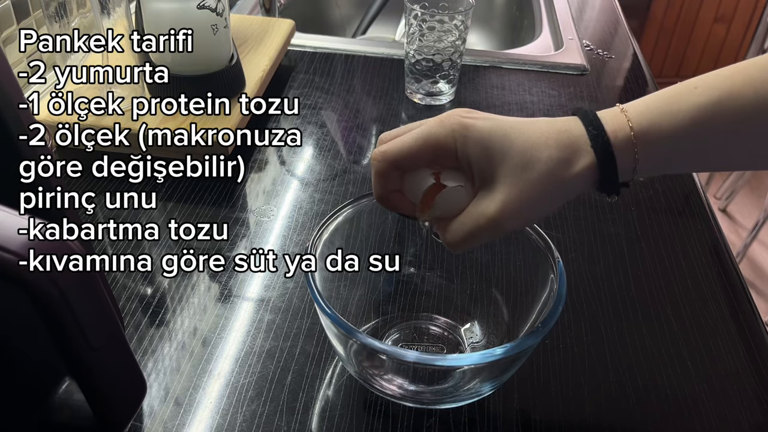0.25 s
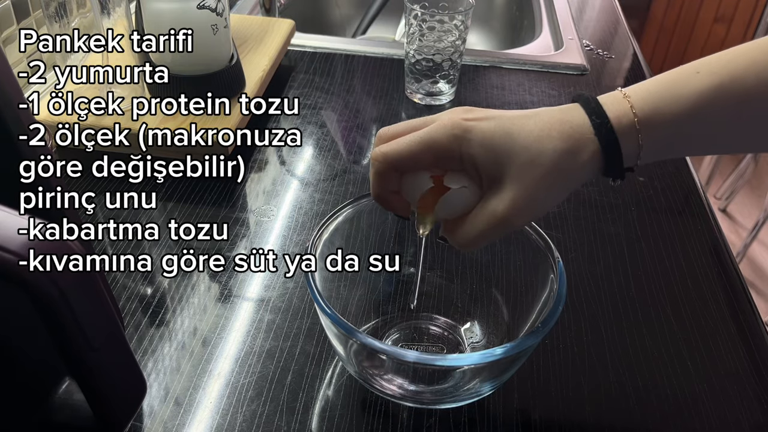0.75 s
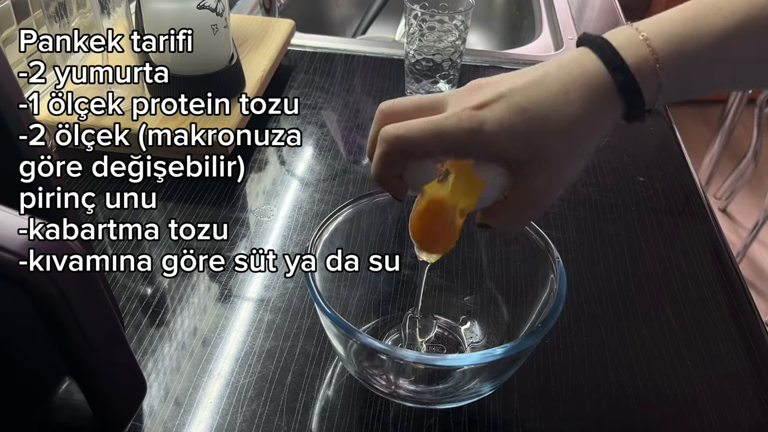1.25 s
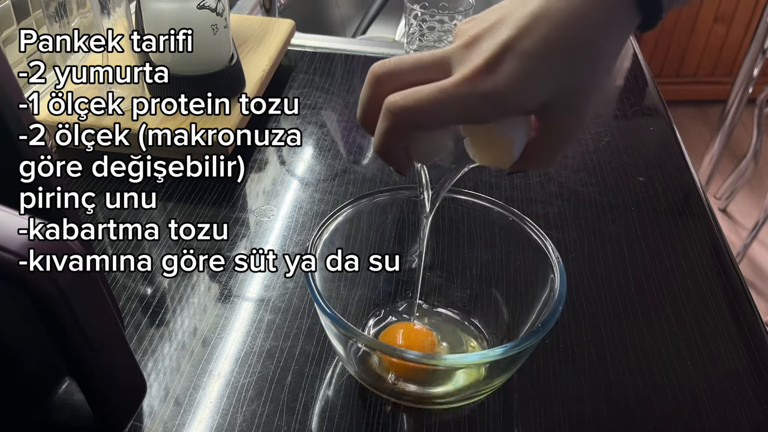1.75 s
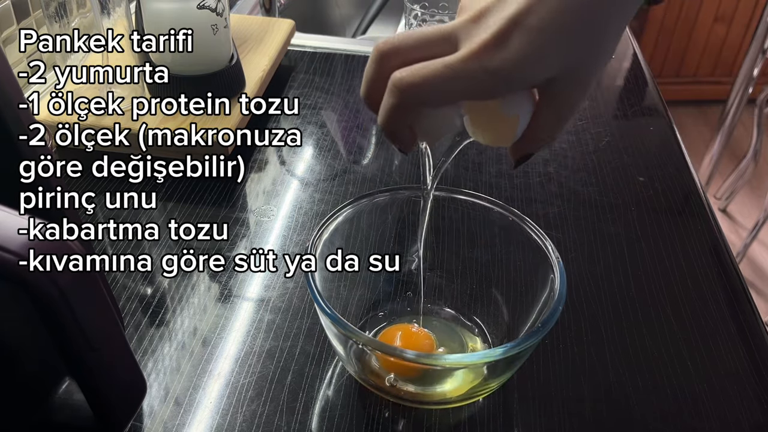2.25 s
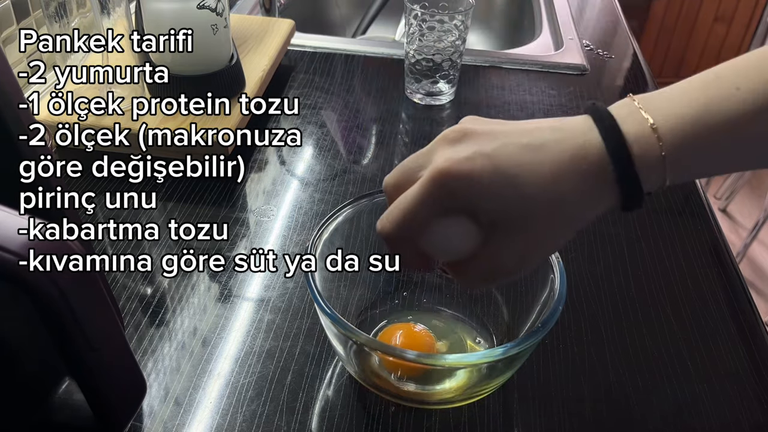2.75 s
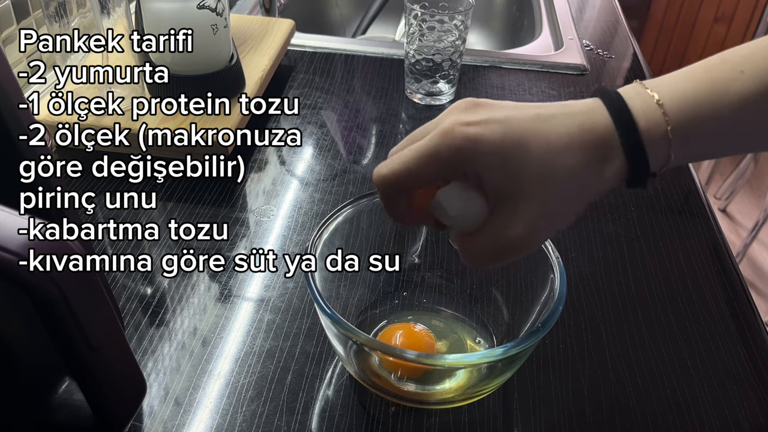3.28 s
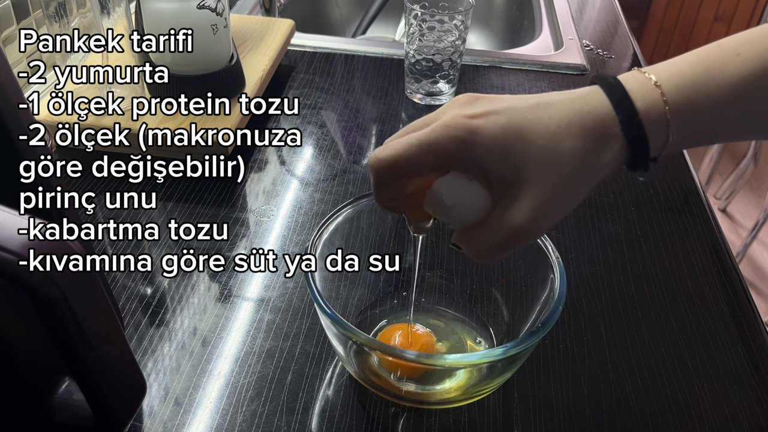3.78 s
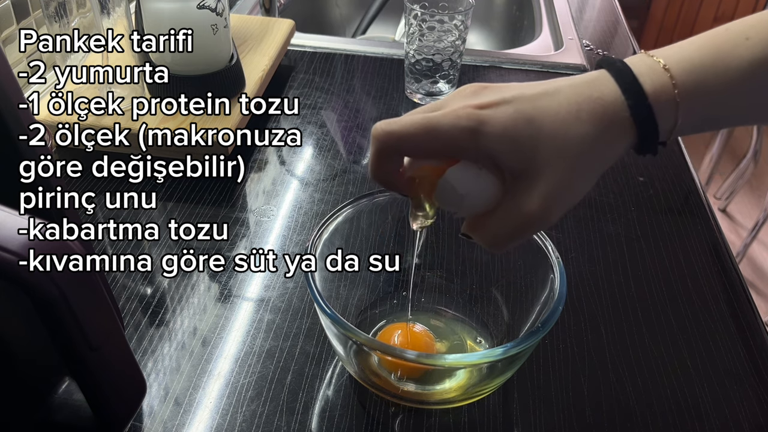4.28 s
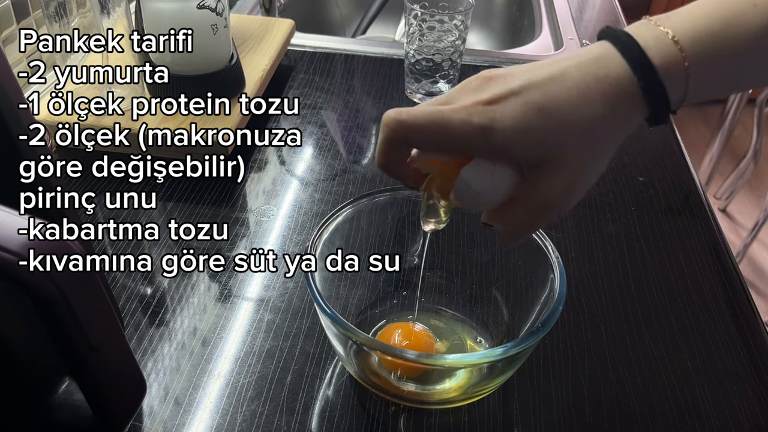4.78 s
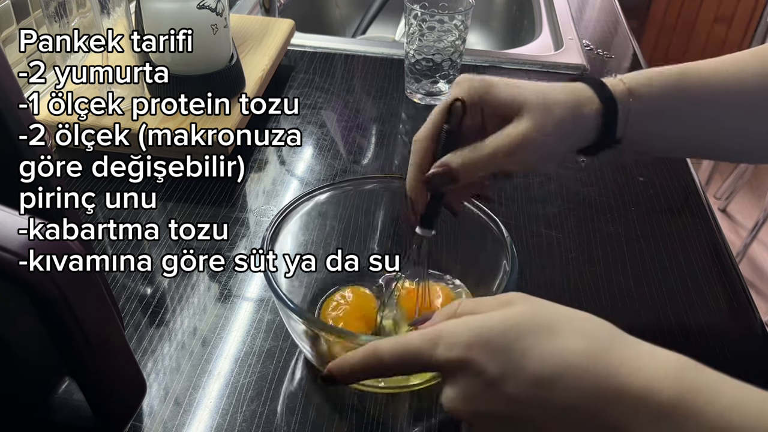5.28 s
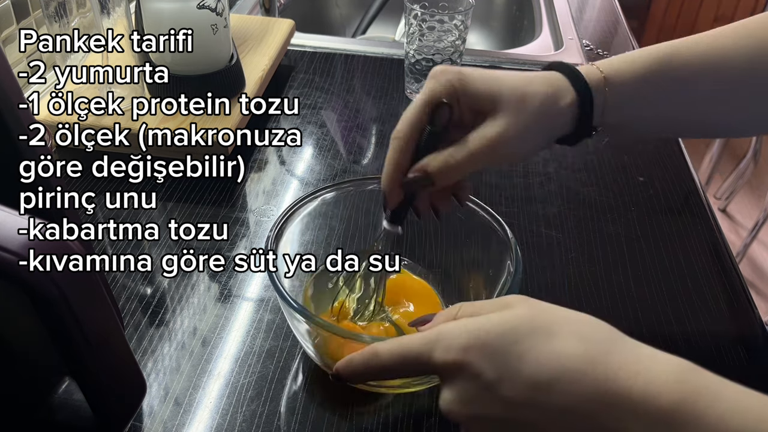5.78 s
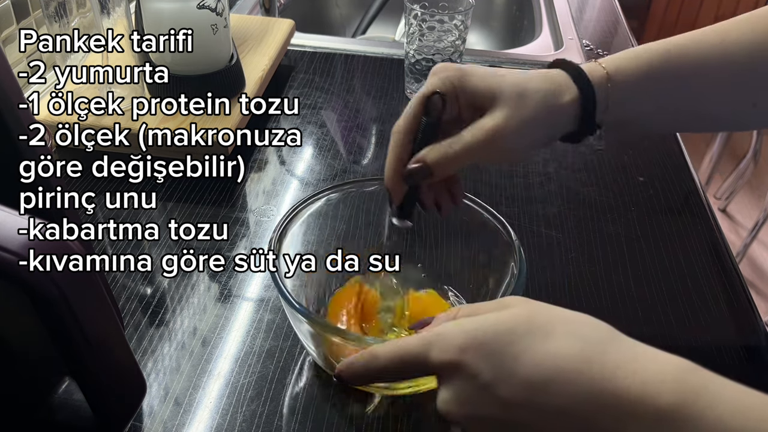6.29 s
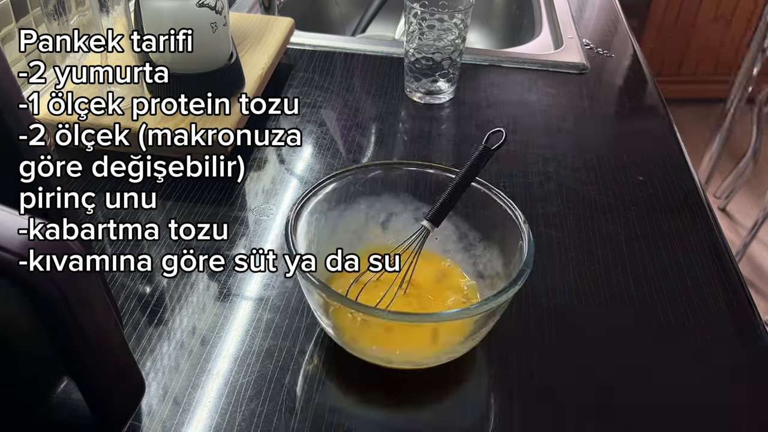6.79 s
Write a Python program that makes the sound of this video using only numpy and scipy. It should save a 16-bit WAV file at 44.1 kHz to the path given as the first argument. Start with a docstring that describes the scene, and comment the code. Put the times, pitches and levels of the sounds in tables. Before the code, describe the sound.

At about 0.2 seconds an eggshell gives way in one hand with a crisp crunch and a soft thud. Brittle snaps follow, thickest around 0.8 seconds. From 1 to 2 seconds the crackles turn quieter and hollower, and a yolk plops faintly at about 1.4. A lull holds only a few tiny ticks. At 3.3 seconds a second shell crunches, with a sharp snap near 3.9 and uneven crackling until 5. From 5.2 seconds a small wire whisk beats the eggs quickly, a little softer than the sharpest cracks. Its wires scrape and tick on the glass bowl, with dull knocks from bowl and counter. The whisking cuts off at about 6.8 seconds, leaving a faint low rumble and hum that runs underneath throughout. Everything sounds close, with the short echoes of a small, hard kitchen.

```python
"""Two eggshells are crushed open in one hand over a glass bowl, then a small wire whisk beats the eggs.
Each snap cracks, rings its piece of shell and sounds the air hollow of hand and shell; squeezes thud,
a yolk plops and fingers slide. Whisk wires scrape and knock the glass, shaking bowl and kitchen counter.
A low background noise fills the small hard room, whose echoes cut off abruptly a few times."""
import sys
import numpy as np
from scipy import signal
from scipy.fft import rfft, irfft, next_fast_len
from scipy.io import wavfile
from scipy.ndimage import uniform_filter1d, map_coordinates

SR = 44100
rng = np.random.default_rng(int(sys.argv[2]) if len(sys.argv) > 2 else 0)


def generate_wav(sig):
    """Save sig (samples, or channels by samples) to the path in sys.argv[1] as 16-bit PCM at SR."""
    pcm = np.round(np.clip(np.atleast_2d(sig).T, -1, 1) * 32767).astype(np.int16)
    wavfile.write(sys.argv[1], SR, pcm)


N = 310243
TIME_S = np.arange(N) / SR


def amp(db):
    """Gain of a level in dB."""
    return 10 ** (np.asarray(db) / 20)

def unit(x):
    """x at rms 1."""
    return x / np.sqrt(np.mean(x ** 2) + 1e-20)

def unit_peak(x):
    """x with its loudest 60 samples at rms 1."""
    return x / np.sqrt(uniform_filter1d(x ** 2, size=60).max())

def along(points, hz):
    """Interpolates (frequency, value) points on a log axis."""
    f, values = np.transpose(points)
    return np.interp(np.log(hz + 1), np.log(f + 1), values)

def curves(rows):
    """One value per sample for each column after the time."""
    times, *columns = np.transpose(rows)
    return [np.interp(TIME_S, times, column) for column in columns]

def wobble(rate_hz):
    """Smooth random curve, rate_hz knots a second."""
    knots = rng.standard_normal(int(N * rate_hz / SR) + 4)
    return map_coordinates(knots, [TIME_S * rate_hz])

def filtered(x, response):
    """x through a complex frequency response."""
    n = x.shape[-1]
    size = next_fast_len(n + min(n // 2, 8192))
    return irfft(rfft(x, size) * response(np.fft.rfftfreq(size, 1 / SR)), size)[..., :n]

def modes(table):
    """Response of (frequency [Hz], width [Hz], gain [dB]) resonances, alternating in sign."""
    return lambda f: sum((-1) ** k * amp(db) * 1j * f * width / (hz * hz - f * f + 1j * f * width)
                         for k, (hz, width, db) in enumerate(table))

def band(hz, width_hz):
    """Response of two equal resonators in series."""
    return lambda f: modes([(hz, width_hz, 0)])(f) ** 2

def shape(points):
    """Response of (frequency [Hz], gain [dB]) points."""
    return lambda f: amp(along(points, f))

def add(out, start_s, sound):
    """Mixes a sound in at a time."""
    part = out[..., round(start_s * SR):][..., :sound.shape[-1]]
    part += sound[..., :part.shape[-1]]

def grit(n, spiky_db):
    """Noise of uneven grains, about 1 ms each."""
    grain_size = np.repeat(rng.standard_normal(n // 40 + 1), 40)[:n]
    return unit(rng.standard_normal(n) * amp(spiky_db * grain_size))

def burst(t, rise_s, t60_s, crumbs_db, crumbs_t60_s):
    """A gritty impact plus fainter crumbs with their own decay."""
    crumbs = amp(crumbs_db - 60 * t / crumbs_t60_s) * grit(len(t), spiky_db=-2)
    impact = amp(-60 * t / t60_s) * grit(len(t), spiky_db=7.5)
    return (impact + crumbs) * (1 - np.exp(-t / rise_s)) ** 2


# (frequency [Hz], left-right correlation [ratio])
CORRELATION = [(60, 1), (200, .85), (400, 0.85), (800, .3), (2000, 0.6), (8000, 0.99)]

def stereo_noise(response):
    """Coloured noise at rms 1; the channels are least alike in the mids."""
    def mid_side_gains(f):
        angle = np.arccos(np.clip(along(CORRELATION, f), -1, 1)) / 2
        return np.array([np.cos(angle), np.sin(angle)])
    mid, side = filtered(rng.standard_normal((2, N)), mid_side_gains)
    return unit(filtered(np.array([mid + side, mid - side]), response))


# low background: (time [s], rumble [dB], drone [dB], hum [dB])
BACKGROUND_LEVELS = [(0, -67.5, -61, -77), (.3, -68, -66, -71), (.6, -86.5, -78.5, -80.5),
                     (1.1, -71.5, -72.5, -75), (1.5, -64.5, -67, -71), (2.0, -66, -66, -73.5),
                     (2.3, -75, -75.5, -79), (2.57, -72, -74, -71.5), (2.7, -62, -67, -71),
                     (3.11, -66, -63.5, -65.5), (3.5, -63, -67, -73), (4.01, -65.5, -66, -69.5),
                     (4.45, -55, -70, -65.5), (4.6, -58.5, -52.5, -71), (5.06, -58.5, -70.5, -74.5),
                     (5.13, -59.5, -66, -62), (6.84, -65.5, -62.5, -73), (7.03, -64.5, -72, -74)]
# noise spectra: (frequency [Hz], gain [dB])
RUMBLE_SPECTRUM = [(15, -40.5), (25, -19.5), (40, -7.5), (58, 2.5), (75, 1), (95, -27.5), (150, -69.5)]
DRONE_SPECTRUM = [(50, -55), (78, -14.5), (100, 1.5), (120, -9.5), (150, -18), (200, -61)]
HUM_SPECTRUM = [(76, -55), (130, -17.5), (209, -3), (247, -11.5), (332, -8), (360, -12.5), (594, -13.5),
                (742, -10), (1100, -38.5), (1430, -70.5), (2420, -120)]
HISS_SPECTRUM = [(600, -38), (900, -2.5), (1500, -0.5), (2500, -11), (4500, -12), (7000, -14), (12500, -22),
                 (13500, -40.5), (16500, -48.5)]

def kitchen(whine_hz=7850, whine_db=-82):
    """Low background rumble, drone and hum, swelling with handling noise; faint hiss and thin whine."""
    rumble_db, drone_db, hum_db = curves(BACKGROUND_LEVELS)
    hiss_db = -81 + 0.43 * (hum_db - hum_db.mean())
    out = amp(rumble_db + wobble(9.5)) * stereo_noise(shape(RUMBLE_SPECTRUM))
    out += amp(drone_db + 4.6 * wobble(5.9)) * stereo_noise(shape(DRONE_SPECTRUM))
    out += amp(hum_db + 1.1 * wobble(5.0)) * stereo_noise(shape(HUM_SPECTRUM))
    out += amp(hiss_db + 1.4 * wobble(1.1)) * stereo_noise(shape(HISS_SPECTRUM))
    whine_band = lambda f: np.exp(-((f - whine_hz) / 200) ** 2)
    return out + amp(whine_db + 2.5 * wobble(2.5)) * stereo_noise(whine_band)


# early reflections: (delay [s], gain [dB])
WALL_ECHOES = [(.0045, -14), (.008, -25.5), (.012, -26), (.017, -27.5)]
# tail decay: (frequency [Hz], t60 [s])
TAIL_DECAY = [(300, 0.18), (1300, 0.29), (3500, 0.32), (9000, 0.34), (15000, 0.22)]
# per-channel tail over the common tail: (frequency [Hz], gain [dB])
TAIL_SPREAD = [(100, -14), (300, 0.5), (700, 11.5), (2000, 1.5), (4500, 1), (8000, -34.5)]
# starts of echo spans, each cutting off the one before: (time [s])
ECHO_STARTS_S = [0, .49, 2.09, 2.6, 5.117, 6.752]

def room(x, tail_db):
    """Near-wall echoes and a diffuse tail, redrawn every quarter second and cut at each span's end."""
    out, step = np.zeros((2, N)), SR // 4
    edges = [round(s * SR) for s in ECHO_STARTS_S] + [N]
    for start, end in zip(edges, edges[1:]):
        for block in range(start, end, step):
            hz, t, spectra = signal.stft(rng.standard_normal((3, SR * 2 // 5)), SR, nperseg=256)
            spectra[1:] *= amp(along(TAIL_SPREAD, hz))[:, None]
            decay = amp(-60 * t / along(TAIL_DECAY, hz)[:, None])
            tails = signal.istft(spectra * decay, SR, nperseg=256)[1]  # common, left, right
            echo = amp(tail_db) * (tails[0] + tails[1:]) / np.linalg.norm(tails[0])
            echo[:, :250] *= np.linspace(0, 1, 250)
            for delay_s, db in WALL_ECHOES:
                arrivals = round(delay_s * SR) + rng.integers(30, size=2)
                echo[[0, 1], arrivals] += amp(db)
            wet = signal.fftconvolve(x[:, block:min(block + step, end)], echo, axes=1)
            add(out[:, :end], block / SR, wet)
    return out


# finger slides: (centre [s], 1/e half-length [s], frequency [Hz], level [dB])
SLIDES = [(0.091, 0.1, 4300, -79), (1.379, 0.07, 5175, -79), (3.623, 0.021, 4500, -73),
          (7.003, 0.033, 1670, -75.5)]

def fingers():
    """Skin slides on shell in short soft hisses."""
    out = np.zeros(N)
    for centre_s, half_s, hz, db in SLIDES:
        span = np.abs(TIME_S - centre_s) < 2 * half_s
        hiss = filtered(grit(span.sum(), spiky_db=-3.5), band(hz, .3 * hz))
        swell = np.exp(-((TIME_S[span] - centre_s) / half_s) ** 2)
        out[span] += amp(db) * unit(hiss) * swell
    return out


# brittle contact, wire or shell: (frequency [Hz], gain [dB])
CRACK_SPECTRUM = [(1500, -53.5), (3000, -29.5), (4500, 0), (5500, 1), (8000, 4.5), (11000, 2.5),
                  (14000, -1), (16500, 1.5)]

def crack(force):
    """The bright click of a hard contact."""
    return unit_peak(filtered(force, shape(CRACK_SPECTRUM)))

def shaken(table, envelope, spiky_db, spread_db=0, detune=0):
    """Tiny slips drive resonances at unit noise gain, with optional scatter in level and pitch."""
    force = envelope * grit(len(envelope), spiky_db)
    response = modes([(hz * (1 + detune * rng.normal()), width, db + rng.normal(0, spread_db))
                      for hz, width, db in table])
    rms_gain = np.sqrt(np.mean(np.abs(response(np.arange(1, SR // 2, 9))) ** 2))
    return filtered(force, response) / rms_gain


# resonances: (frequency [Hz], width [Hz], gain [dB])
WIRE_MODES = [(1250, 340, -13), (1790, 390, -12), (2410, 210, 5), (3100, 190, -11), (3940, 2300, -12),
              (4715, 72, 4.5), (5200, 90, -6), (6550, 130, 6), (6540, 130, -1), (7010, 110, 10),
              (7200, 220, 9), (9000, 1700, -2.5), (10140, 420, 2), (11580, 530, 2), (13260, 2000, -1.5)]
BOWL_MODES = [(196.3, 17.4, -0.5), (324, 40, 5), (431, 23, 8), (590, 310, -7), (676.5, 40, 7.5),
              (845, 73, 0.5), (1207, 80, -7.5), (1630, 340, -21.5)]
COUNTER_MODES = [(56, 27, -8), (103, 14, 3.5), (190.5, 9.2, -8), (248, 53, -16.5)]
# continuous stirring: (time [s], bowl level [dB])
STIR_LEVELS = [(5.225, -64), (5.3, -67), (5.43, -58), (5.72, -59), (6.15, -53.5), (6.59, -55), (6.755, -60)]
# strokes on the glass: (time [s], scrape [dB], bowl [dB], counter [dB])
WHISK_STROKES = [(5.24, -48, -36.5, -30.5), (5.302, -46, -47, -54), (5.409, -47, -42.5, -34),
                 (5.541, -44.5, -49, -40.5), (5.598, -49, -42, -38.5), (5.697, -59, -48, -46),
                 (5.734, -38, -41, -40.5), (5.782, -83, -46, -39.5), (5.894, -57, -47, -50),
                 (5.932, -37, -45.5, -43), (6.046, -60, -47.5, -39), (6.098, -36.5, -38.5, -49),
                 (6.188, -46, -42.5, -68), (6.295, -37.5, -47.5, -58.5), (6.405, -60, -52.5, -50),
                 (6.472, -37.5, -41, -78), (6.619, -48.5, -45.5, -54.5), (6.662, -41.5, -42.5, -52.5)]
# single wires hitting the bowl: (time [s], low band [dB], high band [dB])
WIRE_TICKS = [(5.232, -37.5, -28.5), (5.316, -48.5, -39), (5.3994, -63, -48.5), (5.5159, -50, -41),
              (5.5947, -68, -42.5), (5.691, -54, -45), (5.7813, -53, -32.5), (5.8902, -47.5, -41.5),
              (6.0436, -35, -36), (6.056, -47.5, -33.5), (6.1763, -58, -32.5), (6.205, -55.5, -47),
              (6.2824, -43, -42), (6.4017, -39.5, -44.5), (6.429, -46.5, -38.5), (6.6145, -47.5, -36.5),
              (6.685, -69, -42.5)]

def whisk(stop_s=6.752, rise_ms=9.5, fall_ms=9.84):
    """Wires drag and tick on the glass, shaking bowl and counter; wet wires never ring twice alike."""
    stir = amp(curves(STIR_LEVELS)[0]) * (TIME_S > STIR_LEVELS[0][0])
    out = shaken(WIRE_MODES, amp(-11) * stir, spiky_db=8)
    out += shaken(BOWL_MODES, stir, spiky_db=8)
    out += shaken(COUNTER_MODES, amp(2.5) * stir, spiky_db=-0.5)
    ms = np.arange(-2500, 5500) / SR * 1000
    swell = amp(-5.5 * np.where(ms < 0, (ms / rise_ms) ** 2, np.abs(ms / fall_ms) ** 1.2))
    push = amp(np.where(ms < 0, 1.8 * ms, -.4 * ms))
    for peak_s, scrape_db, bowl_db, counter_db in WHISK_STROKES:
        stroke = amp(scrape_db) * shaken(WIRE_MODES, swell, spiky_db=2.5, spread_db=2.7, detune=0.031)
        stroke += amp(bowl_db) * shaken(BOWL_MODES, swell, spiky_db=2, spread_db=2.8)
        stroke += amp(counter_db) * shaken(COUNTER_MODES, push, spiky_db=5.5, spread_db=0.42)
        add(out, peak_s + ms[0] / 1000, stroke)
    t = TIME_S[:1500]
    for start_s, low_db, high_db in WIRE_TICKS:
        knock = burst(t, rise_s=0.00068, t60_s=0.017, crumbs_db=-46, crumbs_t60_s=0.024)
        low = unit_peak(filtered(knock, band(2600, 900)))
        high = crack(burst(t, rise_s=0.0001, t60_s=0.019, crumbs_db=-20, crumbs_t60_s=0.029))
        add(out, start_s, amp(low_db) * low + amp(high_db) * high)
    return out * (TIME_S < stop_s)


# squeezes and yolk plop: (time [s], level [dB], frequency [Hz], t60 [s])
SOFT_THUDS = [(.185, -50.5, 700, 0.096), (0.2234, -31, 300, .018), (0.2252, -40, 170.4, .035),
              (.228, -40.5, 990, 0.024), (1.37, -56, 220, 0.46), (1.68, -49, 450, .1),
              (3.256, -50.5, 596, 0.18), (3.274, -44.5, 250, 0.23), (3.285, -44, 900, 0.19),
              (4.979, -57.5, 400, 0.17)]

def soft_thuds():
    """Soft low thuds: hand squeezes and the plop of the yolk dropping."""
    out, t = np.zeros(N), TIME_S[:2700]
    for start_s, db, hz, t60_s in SOFT_THUDS:
        attack = 1 - np.exp(-t / (0.044 * t60_s))
        force = rng.standard_normal(len(t)) * amp(-60 * t / t60_s) * attack
        add(out, start_s, amp(db) * unit_peak(filtered(force, band(hz, 1.7 * hz))))
    return out


# air hollow of hand and shell, one curve per egg: (time [s], frequency [Hz], level over ring [dB])
HOLLOW_CURVES = [
    [(.5, 745, -36.5), (.9, 839, -24.5), (1.0, 1466, -5), (1.35, 1537, 2.5), (1.449, 1664, 13.5),
     (1.9, 1820, -3.5)],
    [(3.6, 1970, -24), (3.85, 2020, -15.5), (4.5, 1830, -8), (4.77, 1460, -7), (4.85, 1286, 0),
     (5.1, 1230, -23.5)],
]
# shell breaks: (time [s], ring frequency [Hz], ring with hollow [dB], crack [dB], force t60 [ms])
SHELL_SNAPS = [(.1521, 2860, -60.5, -50.5, 23), (.1816, 2785, -39.5, -25, 16),
               (.1929, 2430, -33.5, -29.5, 35), (0.2235, 3720, -33, -24, 33),
               (0.2288, 4830, -25, -22.5, 12), (.341, 2760, -49, -48, 26), (0.4934, 2750, -57, -50.5, 11),
               (.5038, 4880, -60.5, -53, 24), (0.575, 3570, -61, -56, 51), (0.5901, 5060, -32.5, -25.5, 15),
               (.636, 5060, -47.5, -42, 14), (0.658, 4600, -48.5, -43, 14), (0.6917, 3300, -55.5, -56.5, 7),
               (0.7095, 3820, -51, -42, 26), (.738, 2930, -55, -48, 41), (0.7777, 2600, -32.5, -26, 5),
               (.7833, 4740, -32, -36, 19), (0.8208, 3060, -20, -27, 5), (.8256, 2440, -20.5, -24, 12),
               (.8355, 4100, -28, -28, 32), (.8553, 2480, -27.5, -26.5, 14), (0.8862, 4000, -42, -34.5, 18),
               (0.9082, 2900, -27.5, -28, 3.5), (0.9185, 2800, -41.5, -43, 13),
               (1.0487, 1520, -37.5, -49.5, 10), (1.0839, 1980, -62, -48, 42), (1.1588, 1530, -46, -45, 17),
               (1.2673, 1430, -69, -87, 9.7), (1.2912, 1440, -70, -80, 19), (1.3265, 1460, -65, -84, 20),
               (1.4138, 1640, -54, -52, 12), (1.4209, 1590, -33, -46, 26), (1.4406, 1670, -48.5, -63, 14),
               (1.6326, 1570, -57.5, -84, 8.1), (1.6681, 1520, -34, -57.5, 11),
               (1.683, 1630, -30, -44.5, 13), (1.6988, 1830, -37.5, -46.5, 91.3),
               (1.7629, 1600, -52.5, -72.5, 28), (1.8523, 3000, -58, -65.5, 20),
               (1.875, 1720, -44, -42, 15), (1.92, 2830, -49, -40, 30), (2.5779, 3120, -45.5, -52, 11),
               (2.8906, 2270, -57.5, -63.5, 6), (3.003, 2720, -68.5, -55.5, 11),
               (3.0588, 3830, -59, -60, 12), (3.1042, 2980, -51.5, -51, 7.9), (3.2511, 3300, -44.5, -35, 6),
               (3.2677, 2270, -35.5, -25, 90), (3.284, 2330, -30, -23, 52), (3.2927, 3000, -35, -23, 34),
               (3.3039, 2360, -31, -24.5, 37), (3.313, 4250, -32.5, -23, 22),
               (3.4144, 3980, -53.5, -46.5, 37), (3.4835, 2170, -59, -57, 47),
               (3.6032, 4400, -60.5, -71, 3.2), (3.6435, 4550, -65, -56.5, 5.7),
               (3.6758, 3060, -36, -38.5, 15), (3.728, 4130, -59.5, -56.5, 37), (3.8172, 2120, -44, -41, 8),
               (3.827, 2000, -47, -40, 30), (3.871, 2240, -36.5, -35, 11), (3.9165, 2400, -16.5, -21, 16),
               (3.9316, 3010, -49, -24.5, 17), (3.9493, 3100, -58, -23.5, 10), (3.962, 4820, -47, -26.5, 3),
               (4.017, 3740, -43, -46.5, 22), (4.0595, 2670, -38.5, -30, 7.6),
               (4.085, 4700, -24, -24.5, 55), (4.1217, 4350, -43, -35, 28), (4.2357, 4700, -57.5, -45, 22),
               (4.2503, 1830, -58, -51, 3.3), (4.26, 2770, -31, -26.5, 21),
               (4.3134, 1900, -31.5, -32.5, 19), (4.4383, 1840, -41.5, -45.5, 25),
               (4.455, 4650, -44, -39, 8), (4.4717, 5000, -41, -40.5, 8), (4.5403, 4200, -55, -50.5, 32),
               (4.6477, 4850, -49, -44.5, 14), (4.6589, 4700, -48, -37.5, 5.5),
               (4.7658, 5000, -44.5, -55, 29), (4.7787, 2910, -46.5, -38, 17),
               (4.7861, 4870, -44.5, -35.5, 39), (4.855, 4560, -40, -42.5, 28),
               (4.8744, 4300, -63, -42.5, 27), (4.8857, 4250, -40, -30.5, 23), (4.9356, 3970, -38, -33, 43),
               (4.946, 4050, -44, -31.5, 15), (4.9677, 1220, -33.5, -38, 86), (4.9837, 5000, -26, -22, 9.2),
               (5.01, 1200, -40.5, -31.5, 12)]

def shell_snaps(splinter_db=-28, splinter_t60_ms=20, pan_scatter_db=3):
    """Each snap cracks, rings its piece of shell, sounds the hollow and sheds one faint splinter."""
    out, t = np.zeros((2, N)), TIME_S[:2700]
    hollow_s, hollow_hz, hollow_db = np.transpose(HOLLOW_CURVES[0] + HOLLOW_CURVES[1])
    low_cut = lambda f: (1j * f / (1j * f + 1300)) ** 3  # a small shell radiates no bass
    high_cut = lambda f: 1 / (1 + 1j * f / 5000) ** 2
    splinters = [(s + .04 * rng.uniform(.2, 2.2), hz, ring_db + splinter_db, crack_db + splinter_db,
                  splinter_t60_ms) for s, hz, ring_db, crack_db, _ in SHELL_SNAPS]
    for start_s, hz, ring_db, crack_db, t60_ms in SHELL_SNAPS + splinters:
        t60_s = t60_ms / 1000
        rise_s = 0.00013 + .012 * t60_s  # longer breaks start more softly
        force = burst(t, rise_s, t60_s, crumbs_db=-19.5, crumbs_t60_s=0.058)
        air_hz = np.interp(start_s, hollow_s, hollow_hz)
        air_db = np.interp(start_s, hollow_s, hollow_db)
        air = amp(air_db) * unit_peak(filtered(force, band(air_hz, .16 * air_hz)))
        piece = modes([(hz, 0.31 * hz, 0), (3200, 3000, -10)])
        ring = unit_peak(filtered(force, lambda f: piece(f) * low_cut(f) * high_cut(f)))
        click = crack(burst(t, rise_s, 0.69 * t60_s, crumbs_db=-19, crumbs_t60_s=0.042))
        snap = amp(ring_db) * unit_peak(ring + air) + amp(crack_db) * click
        pan_db = rng.normal(0, pan_scatter_db)
        add(out, start_s, snap * amp([[pan_db / 2], [-pan_db / 2]]))
    return out

def scene():
    """Eggs and whisk with their room echoes, over the kitchen noise."""
    crush = filtered(shell_snaps() + soft_thuds(), lambda f: 1j * f / (1j * f + 60))  # 60 Hz high-pass
    direct = crush + fingers() + whisk()
    return direct + room(direct, tail_db=-10.5) + kitchen()


# left over right: (frequency [Hz], phase lead [rad])
LEFT_PHASE = [(0, 0), (1290, 1.0), (1550, -0.8), (1890, 0.4), (3190, 0.9), (4820, 0.7), (5430, -0.9),
              (6630, -1.0), (7670, -2.8), (9470, -3.9), (10400, -5.9), (12900, -6.3), (14400, -9.0),
              (16400, -9.6)]
# left over right: (frequency [Hz], level [dB])
LEFT_LEVEL = [(60, -0.5), (110, 0.5), (200, 3.5), (380, -4.5), (700, 3), (1290, -1.5), (2380, 0.5),
              (4400, 5), (8120, 1), (15000, -1)]

def record(dry, rolloff_hz=15900, limit_hz=16700):
    """Two close ports differ in phase and level by frequency; the top fades up to a hard band limit."""
    hz, lead_rad = np.transpose(LEFT_PHASE)
    left = lambda f: amp(along(LEFT_LEVEL, f) / 2) * np.exp(.5j * np.interp(f, hz, lead_rad))
    low_pass = lambda f: (f < limit_hz) / (1 + (f / rolloff_hz) ** 10)
    return filtered(dry, lambda f: np.array([left(f), 1 / left(f)]) * low_pass(f))


dry = scene()
out = record(dry)
generate_wav(out)
```